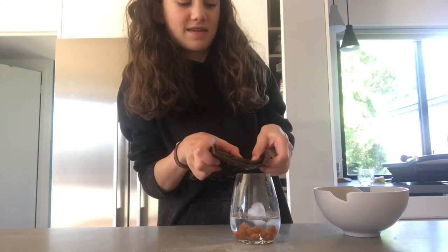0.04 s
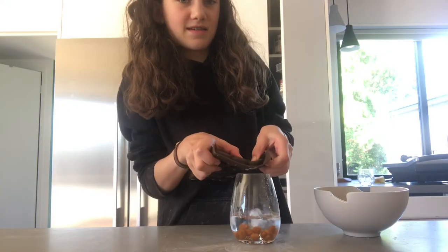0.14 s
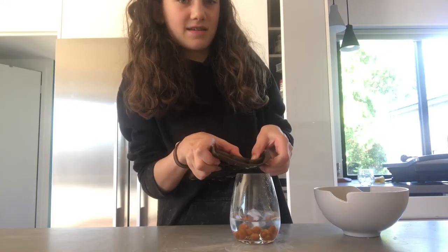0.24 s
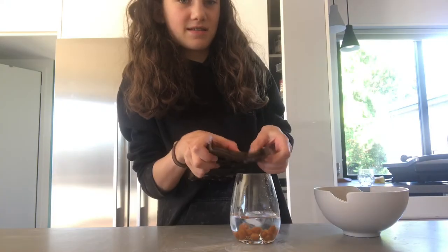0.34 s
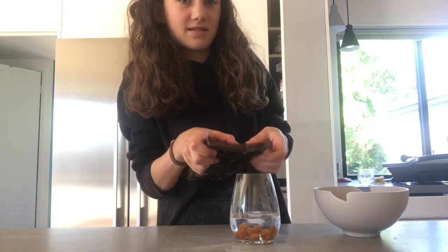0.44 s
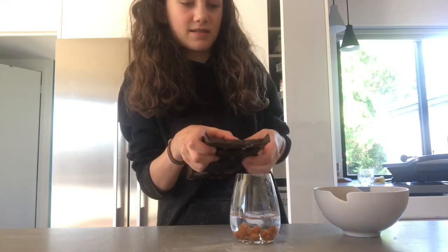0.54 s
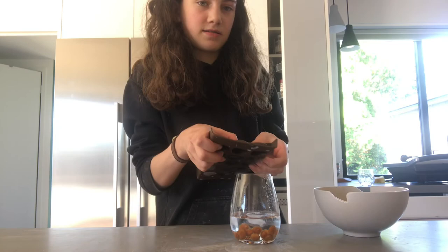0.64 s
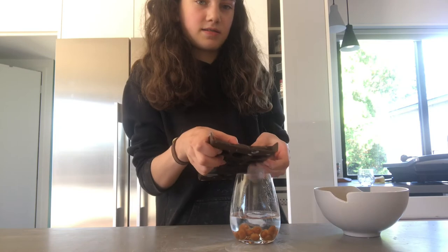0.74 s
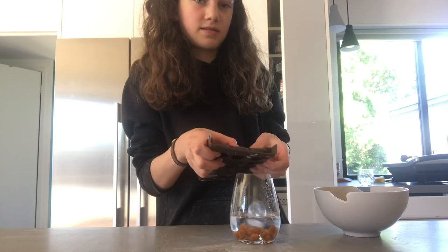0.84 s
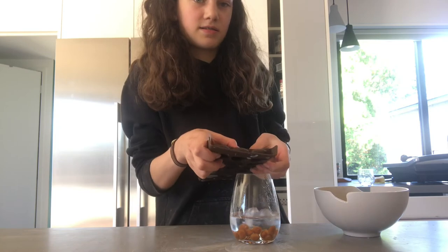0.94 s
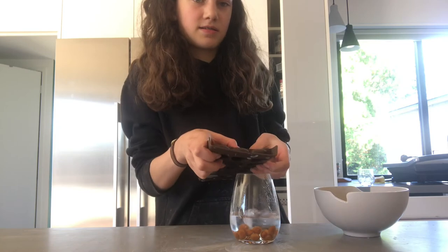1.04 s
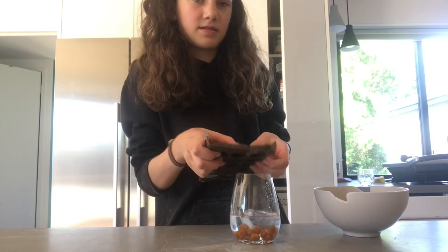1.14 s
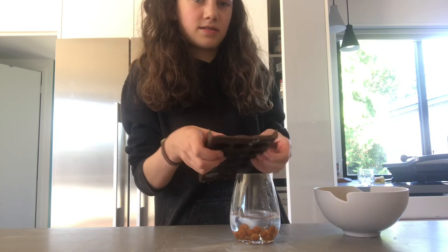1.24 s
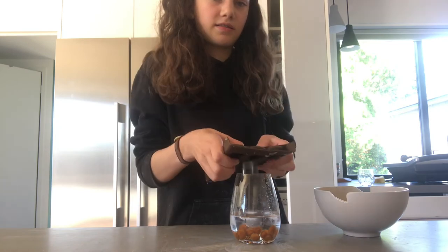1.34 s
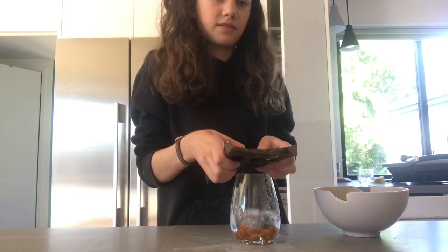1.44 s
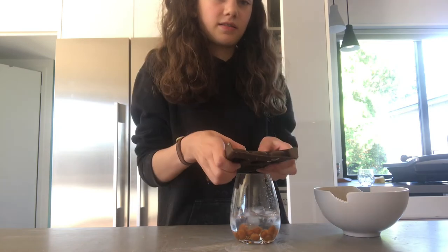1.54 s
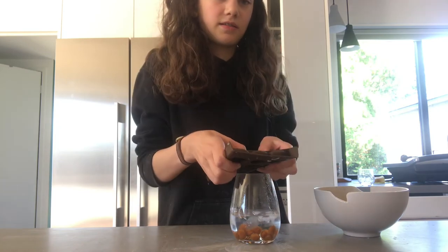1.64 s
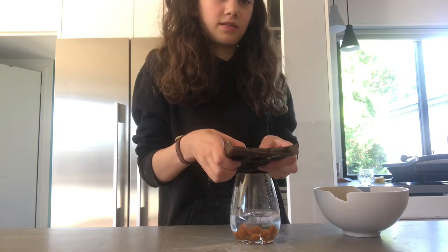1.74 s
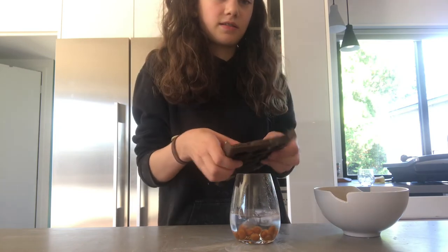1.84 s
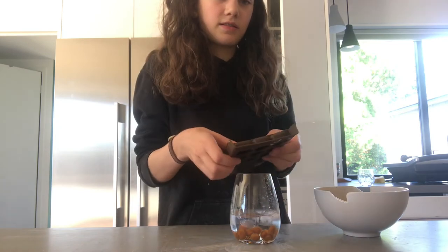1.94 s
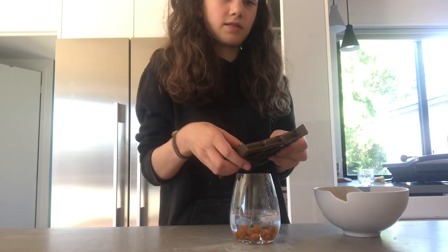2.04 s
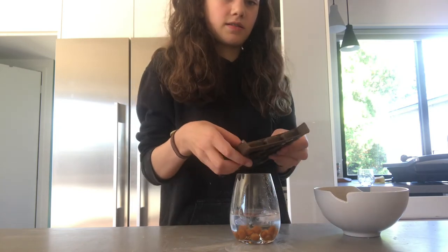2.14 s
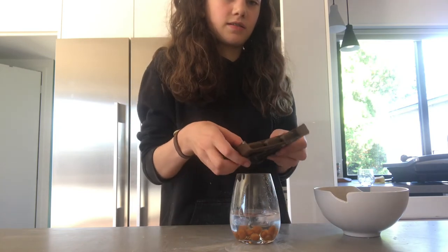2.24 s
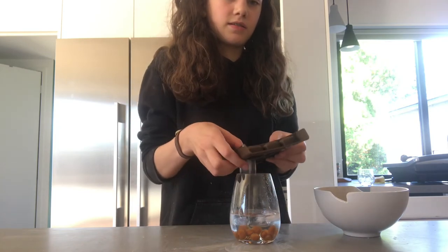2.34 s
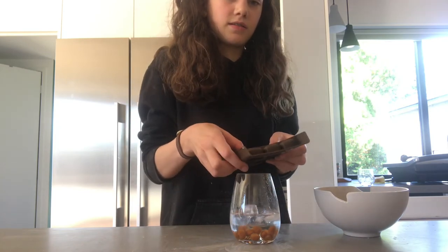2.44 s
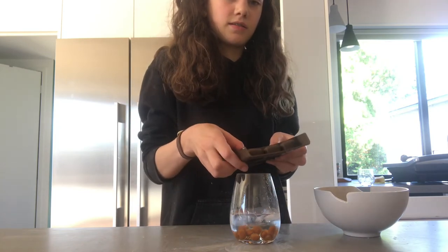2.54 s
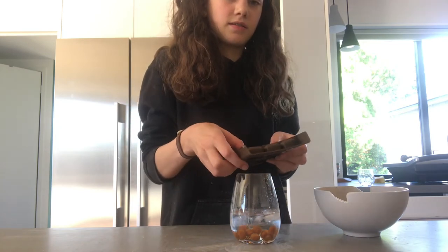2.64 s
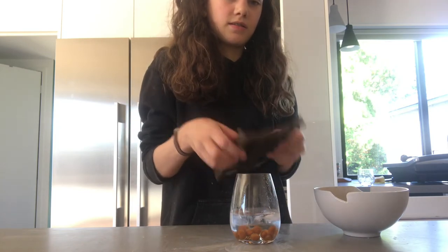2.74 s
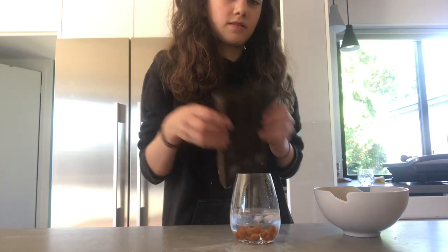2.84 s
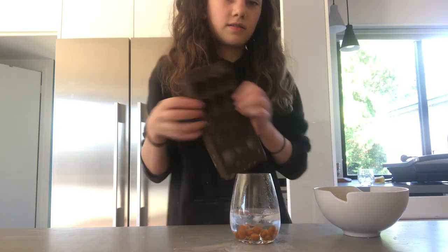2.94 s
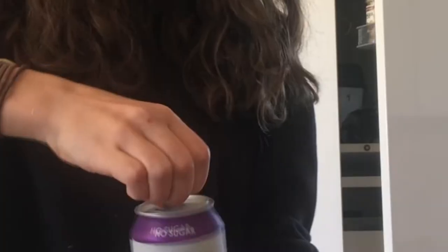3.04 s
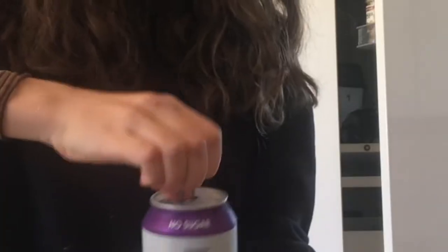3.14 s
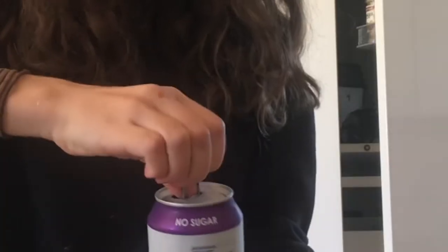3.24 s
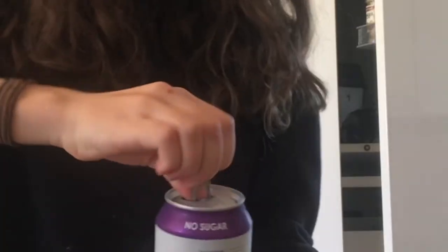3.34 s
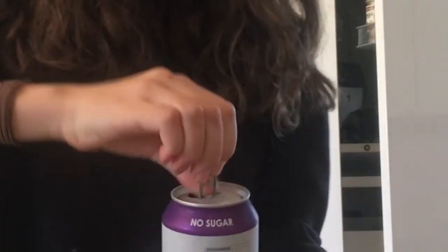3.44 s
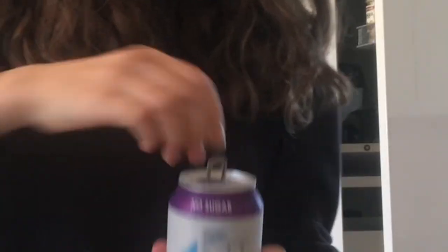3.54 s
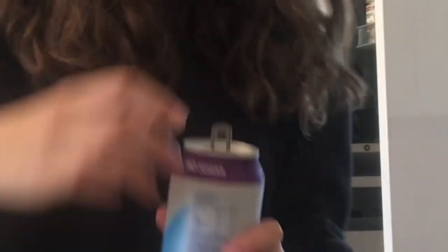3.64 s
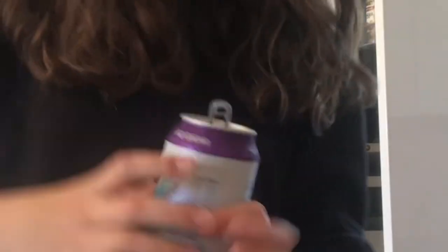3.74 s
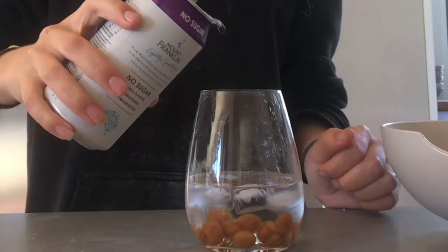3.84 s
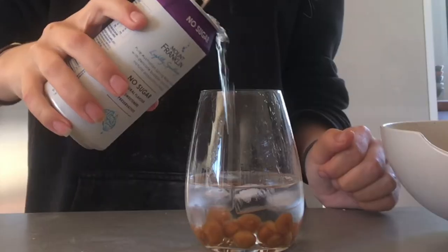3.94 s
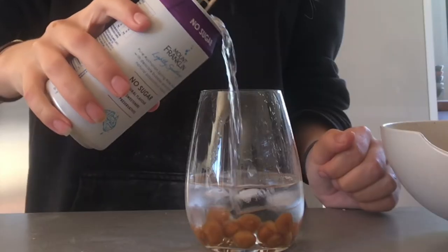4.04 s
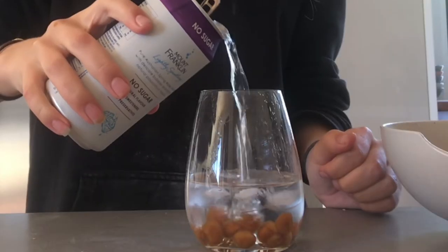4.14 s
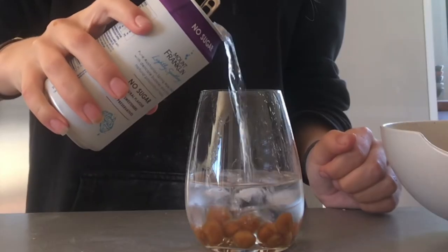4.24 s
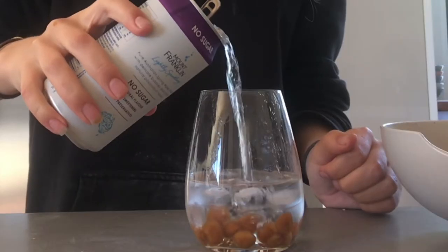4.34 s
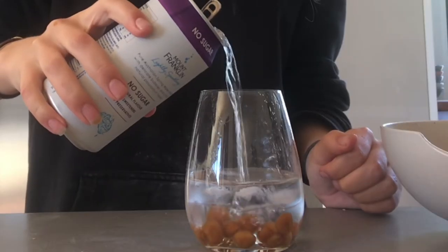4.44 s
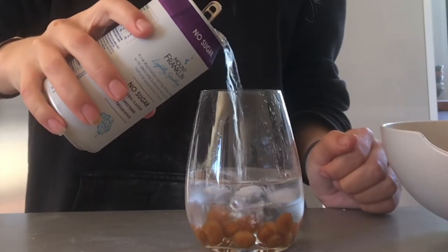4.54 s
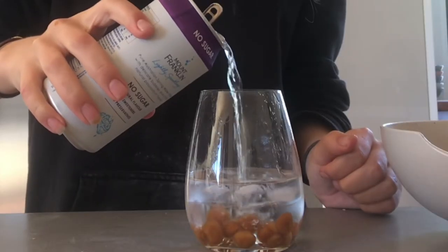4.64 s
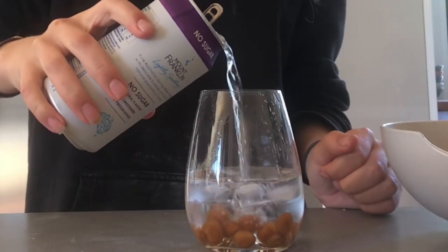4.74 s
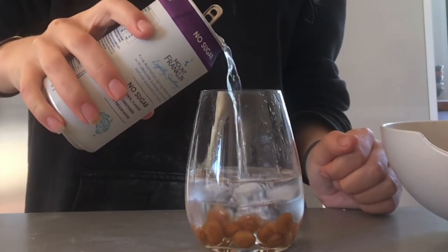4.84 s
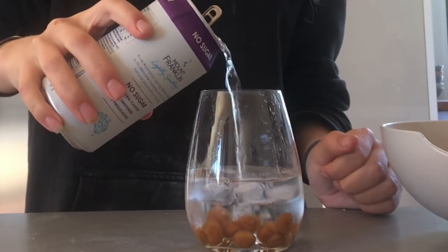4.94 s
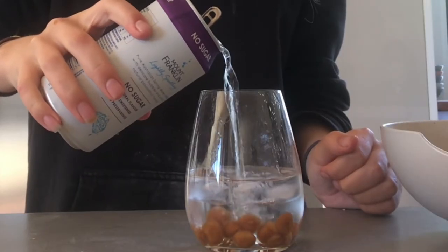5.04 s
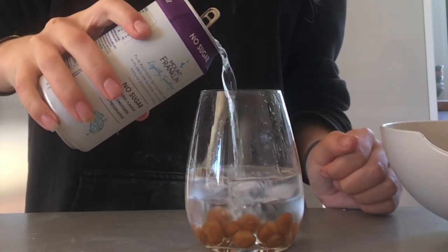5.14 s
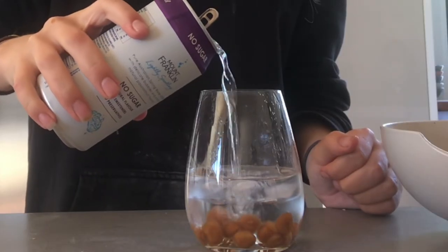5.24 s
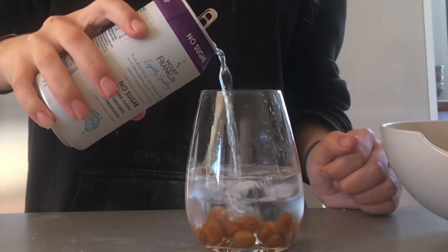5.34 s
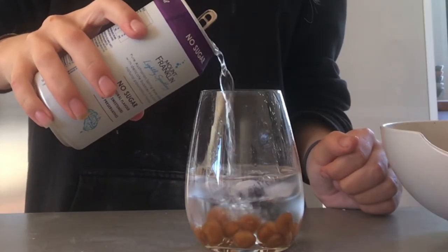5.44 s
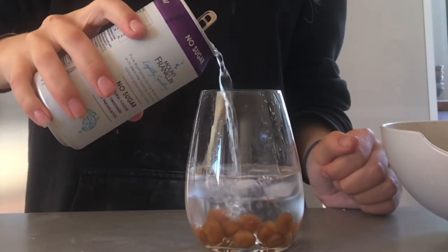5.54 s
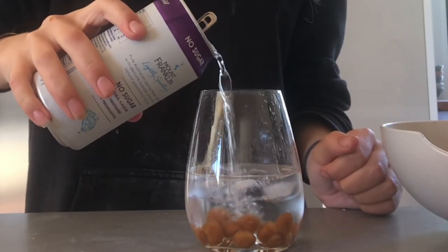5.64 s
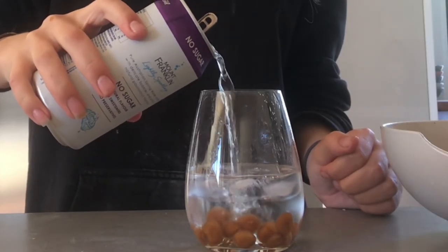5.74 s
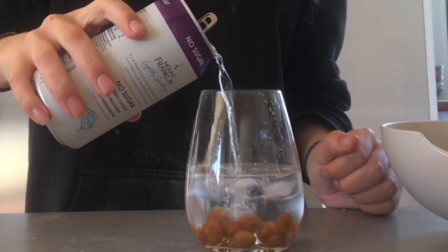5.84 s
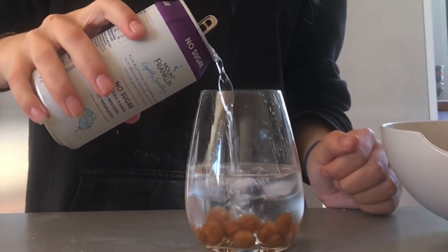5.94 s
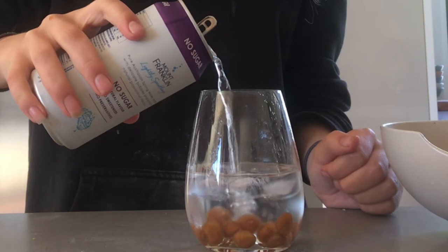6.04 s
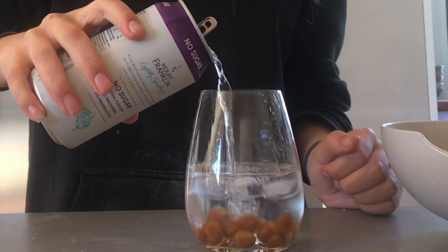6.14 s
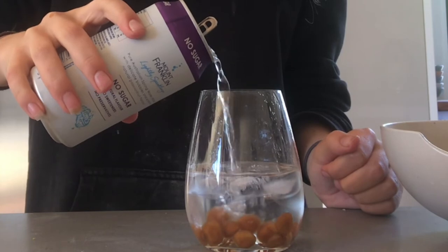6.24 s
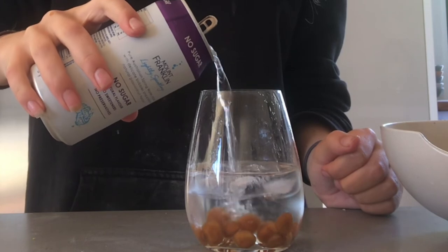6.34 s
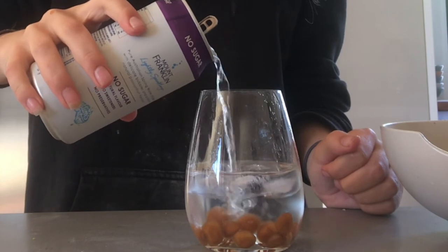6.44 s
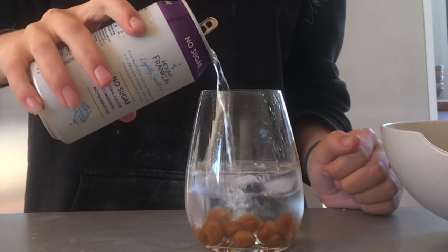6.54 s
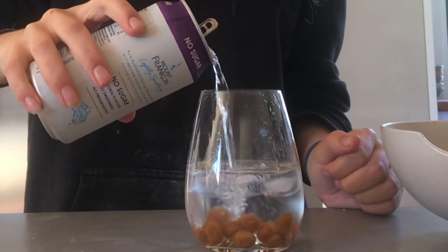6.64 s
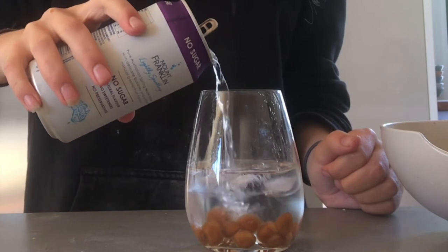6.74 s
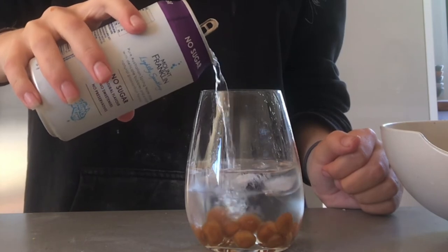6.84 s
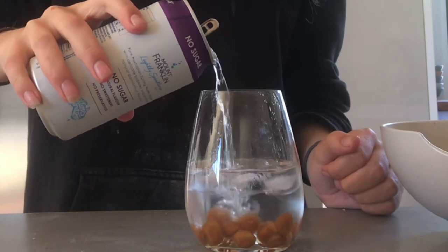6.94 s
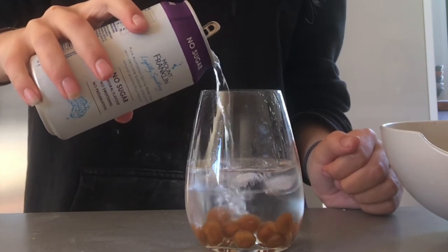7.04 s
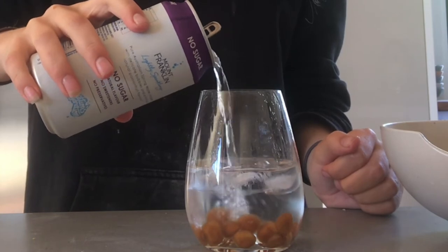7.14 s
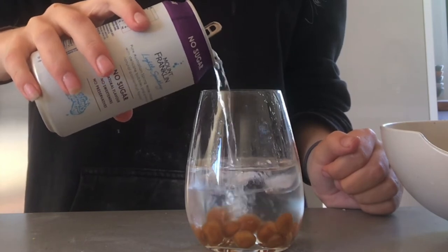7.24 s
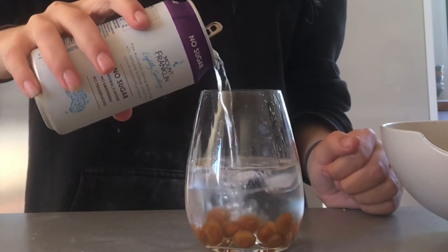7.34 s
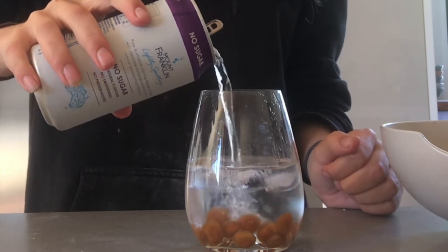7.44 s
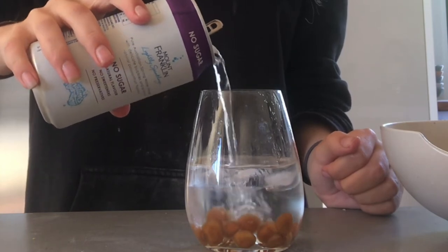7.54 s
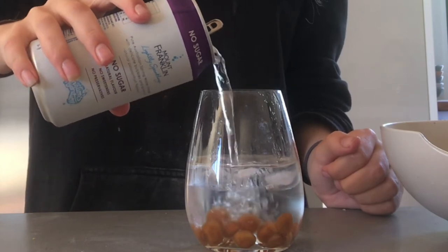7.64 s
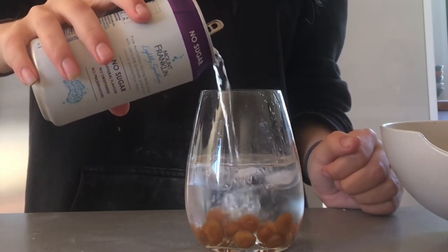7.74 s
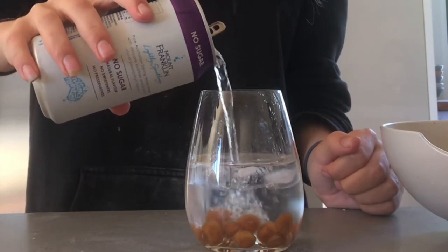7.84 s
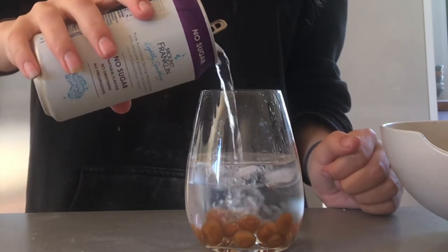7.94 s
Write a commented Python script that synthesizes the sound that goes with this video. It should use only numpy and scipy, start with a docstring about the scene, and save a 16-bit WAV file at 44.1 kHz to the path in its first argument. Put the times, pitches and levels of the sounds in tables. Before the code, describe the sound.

Sharp cracks from a bent plastic tray lead into hard ice knocks and bright glass ringing, ending with a heavy cube drop. A metal tab clicks and the lid bursts open with a brief echoing gasp. Then sparkling water trickles and splashes into the glass, lively gurgles at first, softer bubbling later, with a few faint distant bumps. A single microphone hears it in a mildly reverberant kitchen with a quiet appliance hum.

```python
"""Iced sparkling water in a kitchen

Ice cubes cracked from a plastic tray knock a glass: coloured noise bursts, decaying wall modes.
A can opens: tab ticks, lid bursts, ringing tones and a puff of gas. Sparkling water follows:
swarms of gliding bubble tones splash and fizz, single ones glug in the glass's hollow or plink.
Three distant bumps, soft air noise and an appliance hum lie behind; the events echo in the room.
The level dips briefly five times."""
import sys
import numpy as np
from scipy import signal
from scipy.io import wavfile

SR = 44100
rng = np.random.default_rng(int(sys.argv[2]) if len(sys.argv) > 2 else 0)


def transcribe(u):
    """Save the signal u as a 16-bit wav file named by the first command-line argument.

    u: samples, shape (n,) or (channels, n), limited to [-1, 1]; the rate is SR.
    q: integer samples, one column per channel.
    """
    v = np.clip(np.atleast_2d(u).T, -1, 1)
    q = np.round(v * 32767).astype(np.int16)
    wavfile.write(sys.argv[1], SR, q)


N = 352359
TIME_S = np.arange(N) / SR

# ice touching glass, landing spot sets the modes: t/s, knock level/dB, knock tilt/(dB/octave),
# drive of lowest, second and upper wall modes/dB, twins re upper modes/dB
CLINKS = [(.3, -46, 6, -54, -53.5, -56, -12), (0.7216, -20, 7.5, -56, -40, -22.5, -4),
          (.7244, -18, 1, -31, -29.5, -27.5, -0.5), (.7707, -21, 4.5, -33, -36.5, -24, 0.5),
          (.8361, -13, -1.5, -52, -41, -31, -3.5), (.898, -33.5, 2.5, -47, -46, -48.5, -2),
          (1.4421, -19.5, 0, -57, -51, -45, -10), (1.4689, -23.5, 2.5, -64, -38.5, -50, -6),
          (1.659, -39.5, 1, -54, -49, -58.5, -7.5), (1.8623, -46, 1, -65, -53.5, -69.5, -9),
          (2.4387, -15.5, -1, -28, -59, -41.5, -8), (2.449, -18, 2, -40.5, -49, -59, -10),
          (2.5302, -38.5, 9, -49, -48, -58.5, -10)]
# wall modes of the glass: f/Hz, relative level/dB, t60/s
GLASS_MODES = [(832, -4, 1), (2049, 1.5, 0.55), (2720, -14.5, .2), (3802, -3, 0.78), (4230, -18.5, .13),
               (5600, -19.5, 0.28), (6730, -23.5, 0.25), (7430, -14.5, 0.094)]
# last cube drops hard, glass thuds on the counter: t/s, level/dB, f/Hz
GLASS_THUD = (2.44, -30, 455)
# slight flattening of the glass: t/s, pitch factor/1
GLASS_PITCH = [(.8, 1), (1.45, .991), (2.45, .988)]
# ice knock spectrum: f/Hz, relative level/dB
KNOCK_COLOUR = [(100, -16.5), (170, -8), (480, -1), (1250, 2.5), (1600, -5), (2700, -5), (4300, -12.5),
                (4900, -25.5), (6500, -12.5), (8000, -27), (15000, -45)]
# tray crack spectrum: f/Hz, relative level/dB
TRAY_COLOUR = [(100, -23.5), (400, -12.5), (700, -4.5), (1250, -13), (1500, -17.5), (2350, -22), (2670, -8),
               (2950, -28), (4200, -19), (4900, -38), (7200, -33), (10000, -53.5)]
# lid burst and gas spectrum: f/Hz, relative level/dB
POP_COLOUR = [(130, -45.5), (420, -24.5), (600, -11), (780, -10.5), (1020, 2.5), (1350, -7.5), (2300, -9),
              (3000, -11), (4400, -5), (5600, -14.5), (15000, -31)]
# tab tick spectrum: f/Hz, relative level/dB
TAB_COLOUR = [(300, -20.5), (1500, -10), (4000, -11.5), (5500, 1.5), (8500, -3.5), (10500, -20),
              (15000, -22.5)]
# distant bump spectrum: f/Hz, relative level/dB
BUMP_COLOUR = [(29, -45), (50, -23.5), (168, -11), (400, -19), (711, -9), (900, -12.5), (1300, -4.5),
               (1650, -10), (2200, -14), (3200, -26.5), (10400, -74)]
# water splash spectrum: f/Hz, relative level/dB
SPLASH_COLOUR = [(100, -31), (380, -8.5), (600, 5.5), (750, -5.5), (960, 1), (1300, -8.5), (2200, -17.5),
                 (2950, -22), (4800, -30.5), (9000, -49.5)]
# fizz and drop impact spectrum: f/Hz, relative level/dB
FIZZ_COLOUR = [(1500, -18.5), (3400, 0), (4800, -14), (6400, -2.5), (7150, 1.5), (8000, -15),
               (15000, -21.5)]
# room air spectrum: f/Hz, relative level/dB
AIR_COLOUR = [(18, -36.5), (45, -10), (101, -1), (129, -8.5), (178, -5), (215, -9.5), (322, -6),
              (469, -9.5), (598, -11), (1340, -19), (4000, -25.5), (15500, -38.5)]
# tray cracks and creaks as it is bent: t/s, level/dB, decay/s
TRAY_CRACKS = [(.0, -16.5, 0.0065), (.008, -21, 0.0033), (.045, -25.5, 0.0081), (.2774, -43.5, 0.0048),
               (.485, -39.5, 0.018)]
# tab strains: t/s, level/dB, decay/s
TAB_TICKS = [(3.0152, -30.5, 0.0046), (3.0196, -22.5, .001), (3.022, -25.5, .001), (3.026, -26.5, .002)]
# lid tears open: t/s, level/dB, decay/s
LID_POPS = [(3.0336, -6, 0.0014), (3.0347, -12.5, 0.0012)]
# bent tab rings as the fingers leave it: t/s, level/dB, f/Hz
TAB_PINGS = [(3.453, -61, 4030), (3.486, -55.5, 1790)]
# air driven under by the stream: t/s, relative bubble level/dB, relative hollow level/dB
GLUGS = [(4.059, -38.5, -65), (4.111, -35.5, -53), (4.149, -43, -39), (4.219, -31, -58), (4.237, -29, -53),
         (4.296, -35, -54), (4.359, -31, -49), (4.393, -37.5, -56), (4.448, -32, -41.5),
         (4.557, -36.5, -50), (4.574, -37, -45), (4.593, -39, -42.5), (4.675, -35, -52),
         (4.81, -40.5, -44.5), (4.871, -45, -43.5), (5.1, -49, -46.5), (5.131, -37, -42),
         (5.158, -35.5, -40.5), (5.331, -38.5, -57), (5.445, -45, -58), (5.481, -42, -49),
         (5.528, -35.5, -41.5), (5.661, -42, -53), (5.685, -38, -50), (5.712, -39, -48), (5.737, -39, -41),
         (5.769, -39, -39.5), (5.941, -40.5, -51), (5.954, -39.5, -51), (6.023, -43, -44.5),
         (7.386, -46.5, -53.5), (7.487, -49, -59), (7.693, -49.5, -62)]
# mean glug pitch as the pool deepens: t/s, f/Hz
POOL_PITCH = [(4.06, 1106), (4.14, 917), (4.8, 866), (5.13, 900), (7.5, 1030)]
# loudest small bubbles under the surface: t/s, level of the first/dB, f/Hz
PLINKS = [(4.04, -49.5, 2620), (4.211, -53.5, 3000), (4.298, -54, 5270), (4.391, -53.5, 6850),
          (4.449, -59, 5800), (4.5967, -46, 2910), (4.638, -49, 3250), (4.6838, -48, 2610),
          (4.73, -54, 2800), (5.223, -48, 2730), (5.283, -53.5, 3330), (5.361, -51, 2980),
          (5.658, -48, 3480), (5.897, -54, 2640), (6.066, -51, 2630), (6.2, -50.5, 3300),
          (6.746, -45.5, 3350), (6.97, -52.5, 2760), (7.5, -58, 2820)]
# strength of the stream: t/s, splash level/dB
FLOW = [(3.99, -100), (4.05, -61), (4.4, -70.5), (4.65, -54), (4.97, -58), (5.2, -57), (5.8, -58.5),
        (6.9, -60), (7.99, -73.5)]
# distant bumps: t/s, relative level/dB, decay/s
BUMPS = [(6.254, -21.5, 0.018), (6.266, -15, 0.0055), (6.293, -20.5, 0.042), (6.42, -30, 0.014),
         (6.434, -22, 0.004), (6.657, -28.5, 0.031)]
# reverberation of the kitchen: f/Hz, t60/s
ROOM_T60 = [(100, 0.95), (500, 0.48), (1300, 0.53), (4000, 0.48), (8000, 0.39), (14000, 0.3)]
# brief level dips: t/s
DIPS_S = [.592, 1.292, 2.025, 2.99, 3.858]

SPLIT_HZ = 28  # uneven wall: each upper mode beats with a lower twin
HOLLOW_HZ = 579
GAS_S, GAS_DB, GAS_DECAY_S = 3.036, -16, 0.0098
GURGLE_DB, SPATTER_DB, TINKLE_DB, FIZZ_DB = -8.5, -14, -21, -19.5  # re splash, before boosts
ICE_COVERED_S, COVERING_S = 4.65, 0.17
BARE_ICE_FIZZ_DB, BARE_ICE_IMPACT_DB = 10.5, 23.5  # boosts while water lands on bare ice
STAND_OUT_DB_PER_DB = 0.4  # bubble gain per dB the stream loses
AIR_DB = -63
EDGE_HZ = 15800


def ice():
    """Each cube knocks and rings the wall modes until the next touch or dip ends the ring."""
    knocks, rings = np.zeros(N), np.zeros(N)
    t = TIME_S[:SR]
    ends_s = np.array([row[0] for row in CLINKS] + list(DIPS_S))
    for s, knock_db, tilt_db, low_db, second_db, upper_db, twin_db in CLINKS:
        knock = blow(KNOCK_COLOUR, decay_s=0.0053, tilt_db=tilt_db, snap=0.38)
        add(knocks, s, amp(knock_db) * knock)
        pitch = np.interp(s, *np.transpose(GLASS_PITCH))
        hold_s = ends_s[ends_s > s].min() - s
        attack = np.minimum(t / .0005, 1)
        held = np.clip((hold_s - t) / .002 + 1, 0, 1) * attack
        for hz, db, t60_s in GLASS_MODES:
            drive_db = low_db if hz < 1400 else second_db if hz < 3000 else upper_db
            ring = np.sin(2 * np.pi * hz * pitch * t)
            if hz > 3000:
                ring += amp(twin_db) * np.sin(2 * np.pi * (hz - SPLIT_HZ) * pitch * t)
            add(rings, s, held * amp(drive_db + db - 60 * t / t60_s) * ring)
    s, db, hz = GLASS_THUD
    add(knocks, s, amp(db) * bubble(hz, swell_s=0.0053, rise=0))
    ringing = kitchen(rings, wet_db=-9, counter=0)
    return ringing + kitchen(knocks, wet_db=-8.5, counter=0.16)


def tray():
    """Plastic cracks as cubes break loose (noise bursts); a soft low thud as the grip shifts."""
    out = blows(TRAY_CRACKS, TRAY_COLOUR, snap=0.5)
    add(out, 2.29, amp(-54) * bubble(hz=159, swell_s=0.021, rise=0, size=6000))
    return kitchen(out, wet_db=-3.0)


def can():
    """Tab ticks, lid bursts and rings briefly, a mostly reverberant puff of gas follows."""
    out = blows(TAB_TICKS, TAB_COLOUR, snap=0.59) + blows(LID_POPS, POP_COLOUR, snap=0.69)
    add(out, 3.0333, amp(-14.5) * bubble(hz=1020, swell_s=0.0019, rise=0))
    for s, db, hz in TAB_PINGS:
        add(out, s, amp(db) * bubble(hz, swell_s=0.0069, rise=0))
    lid = kitchen(out, wet_db=-14, counter=0.14)
    gas = blows([(GAS_S, GAS_DB, GAS_DECAY_S)], POP_COLOUR, snap=0)
    return lid + kitchen(gas, wet_db=3)


def stream():
    """Bubble swarms follow the flow; small glugs and plinks stand out more as it thins."""
    splash = swarm(per_s=1000, low_hz=249.3, high_hz=4340, cycles=2.6, spread_db=5.5)
    splash = evened(colour(splash, SPLASH_COLOUR))
    gurgle = evened(swarm(per_s=64, low_hz=790, high_hz=1260, cycles=2.5, spread_db=7.5, count=8))
    tinkle = evened(swarm(per_s=31, low_hz=2665, high_hz=3484, cycles=16.0, spread_db=5.5, count=8))
    fizz = swarm(per_s=430, low_hz=2767, high_hz=14000, cycles=4.6, spread_db=9.5)
    fizz = evened(colour(fizz, FIZZ_COLOUR))
    spatter = evened(swarm(per_s=200, low_hz=1290, high_hz=3512, cycles=5.0, spread_db=4.5,
                           rise=.12, count=16))
    flow_db = np.interp(TIME_S, *np.transpose(FLOW))
    bubbles = amp(GURGLE_DB) * gurgle + amp(TINKLE_DB) * tinkle
    bubbles *= amp(STAND_OUT_DB_PER_DB * (flow_db.max() - flow_db))
    fizz *= amp(FIZZ_DB + BARE_ICE_FIZZ_DB * bare_ice(TIME_S))
    water = splash + amp(SPATTER_DB) * spatter + bubbles + fizz
    return kitchen(water * amp(flow_db), wet_db=-6.0)


def glugs():
    """Each glug slaps the surface, rings as a large bubble and stirs the glass's hollow."""
    out = np.zeros(N)
    variations = rng.standard_normal((len(GLUGS), 2))
    for (s, db, hollow_db), (size, wobble) in zip(GLUGS, variations):
        bubble_hz = np.interp(s, *np.transpose(POOL_PITCH)) * (1 + 0.044 * size)
        hollow_hz = HOLLOW_HZ * (1 + 0.058 * wobble)
        large_bubble = bubble(bubble_hz, swell_s=0.0028, rise=0)
        hollow = bubble(hollow_hz, swell_s=0.0038, rise=0.069)
        slap = blow(SPLASH_COLOUR, decay_s=0.0051, tilt_db=5.0, snap=0.52)
        add(out, s - .001, amp(db - 1.0) * large_bubble)
        add(out, s - .001, amp(hollow_db + 4) * hollow)
        add(out, s, amp(db - 10.5) * slap)
    return kitchen(out, wet_db=-6.5)


def plinks():
    """A drop lands, harder on bare ice; its bubble splits into ever smaller, higher ones."""
    out = np.zeros(N)
    all_gaps = rng.uniform(1.0, 1.9, (len(PLINKS), 3))
    for (s, db, hz), gaps in zip(PLINKS, all_gaps):
        tilt_db = 2.5 * np.log2(hz / 4000)
        impact = blow(FIZZ_COLOUR, decay_s=0.0051, tilt_db=tilt_db, snap=0.26)
        add(out, s, amp(db - 21 + BARE_ICE_IMPACT_DB * bare_ice(s)) * impact)
        delays_s = 0.0034 * (np.cumsum(gaps) - gaps[0])
        for k, delay_s in enumerate(delays_s):
            part = bubble(hz * (1 + 0.069 * k), swell_s=0.002, rise=0.042)
            add(out, s + delay_s, amp(db - 6.2 * k) * part)
    return kitchen(out, wet_db=-3.5)


def bare_ice(s):
    """1 while the stream lands on bare ice, 0 once the pool covers it."""
    return np.clip((ICE_COVERED_S - s) / COVERING_S, 0, 1)


def bumps():
    """Noise bursts far off in the house, mostly reverberation."""
    return amp(-4.5) * kitchen(blows(BUMPS, BUMP_COLOUR, snap=0), wet_db=2)


def room_tone(hum_hz=101.7, hum_db=-74):
    """Air as coloured noise, appliance hum as a steady sine."""
    air = amp(AIR_DB) * evened(colour(rng.standard_normal(N), AIR_COLOUR))
    return air + amp(hum_db) * np.sin(2 * np.pi * hum_hz * TIME_S)


def kitchen(x, wet_db, counter=0.062, counter_s=.0036):
    """Direct sound, counter bounce, and a sparse-tap tail that dies faster in the treble."""
    at = np.arange(250, SR - 20, 20)
    taps = np.zeros(SR)
    taps[at + rng.integers(0, 20, len(at))] = rng.choice([-1, 1], len(at))
    hz, t, z = signal.stft(taps, SR, nperseg=256)
    decay = amp(-60 * t / read(ROOM_T60, hz)[:, None])
    tail = signal.istft(z * decay, SR, nperseg=256)[1]
    echo = amp(wet_db) * tail / np.linalg.norm(tail)
    echo[0] += 1
    echo[round(counter_s * SR)] += counter
    return signal.oaconvolve(x, echo)[:N]


def bubble(hz, swell_s, rise, size=3000):
    """Tone that swells and dies, its pitch gliding up by the fraction rise near the surface."""
    u = np.arange(size) / SR / swell_s
    envelope = (u * np.exp(1 - u)) ** 2
    glide_hz = hz * (1 + rise * np.tanh(u / 2))
    return envelope * np.sin(2 * np.pi * np.cumsum(glide_hz) / SR)


def swarm(per_s, low_hz, high_hz, cycles, spread_db, rise=.024, count=30):
    """Bubbles of count sizes at random moments; a few are much louder."""
    out = np.zeros(N)
    chance = per_s * N / SR / count / 400  # of each of 400 candidates per size
    for hz in np.geomspace(low_hz, high_hz, count):
        at, size, keep = rng.random((3, 400))
        level_db = spread_db * -np.log(.03 + .97 * size)
        clicks = np.zeros(N)
        clicks[(at * N).astype(int)] = amp(level_db) * (keep < chance)
        out += signal.oaconvolve(clicks, bubble(hz, cycles / hz, rise))[:N] * hz
    return out


def blow(points, decay_s, tilt_db=0, snap=1, size=12000):
    """Sharp snap plus dying rattle in one colour, energy of 0.5 ms at full level."""
    rattle = rng.standard_normal(size) * np.exp(-np.arange(size) / SR / decay_s)
    rattle /= np.linalg.norm(rattle)
    rattle[0] += snap
    sound = colour(rattle, points, tilt_db)
    return sound / np.linalg.norm(sound) * np.sqrt(SR / 2000)


def blows(rows, points, snap):
    """Plays a table of blows on one object."""
    out = np.zeros(N)
    for s, db, decay_s in rows:
        add(out, s, amp(db) * blow(points, decay_s, snap=snap))
    return out


def colour(x, points, tilt_db=0, size=4096):
    """Causal minimum-phase filter of unit energy with the given spectrum, tilted per octave."""
    hz = abs(np.fft.fftfreq(size, 1 / SR))
    octaves = np.log2(hz / 1000 + 1 / 20)  # re 1 kHz, levels off at the bottom
    log_gain = np.log(amp(read(points, hz) + tilt_db * octaves))
    taps = np.fft.ifft(np.exp(np.conj(signal.hilbert(log_gain)))).real[:size // 2]
    return signal.oaconvolve(x, taps / np.linalg.norm(taps))[:len(x)]


def read(points, hz):
    """Reads a spectrum on a log-frequency axis."""
    f, value = np.transpose(points)
    return np.interp(np.log(hz + 1), np.log(f + 1), value)


def amp(db):
    """Decibels to gain."""
    return 10 ** (np.asarray(db) / 20)


def evened(x):
    """Scales to rms 1."""
    return x / np.sqrt(np.mean(x ** 2) + 1e-20)


def add(mix, s, sound):
    """Mixes a sound in at s seconds."""
    part = mix[max(round(s * SR), 0):][:len(sound)]
    part += sound[:len(part)]


def scene():
    """All sources at one microphone."""
    events = ice() + tray() + can()
    water = stream() + glugs() + plinks()
    return (events + water + bumps() + room_tone())[None]


def record(dry, fade_s=0.034):
    """Level fades almost out and back in at each dip; then a low-pass at EDGE_HZ."""
    distance_s = abs(TIME_S[:, None] - np.array(DIPS_S)).min(1)
    gain = np.minimum(distance_s / fade_s + .02, 1)
    low_pass = signal.firwin(511, EDGE_HZ, window=("kaiser", 9), fs=SR)
    return signal.oaconvolve(dry * gain, low_pass[None], "same")


dry = scene()
out = record(dry)
transcribe(out)
```